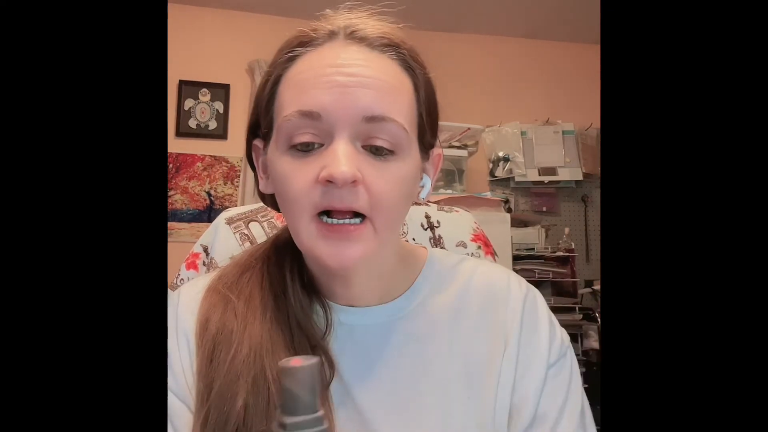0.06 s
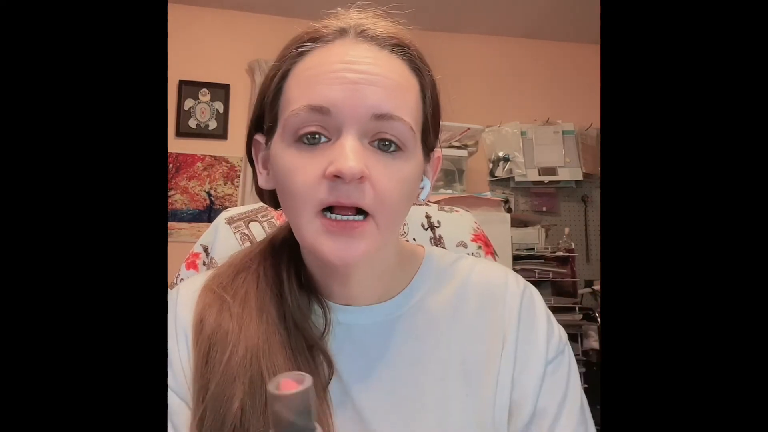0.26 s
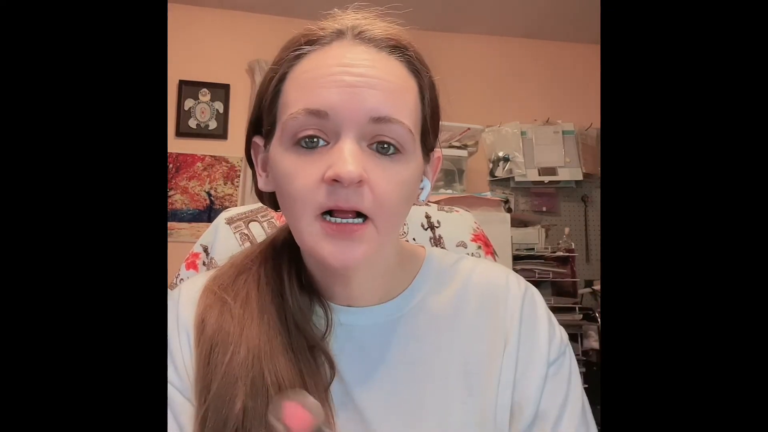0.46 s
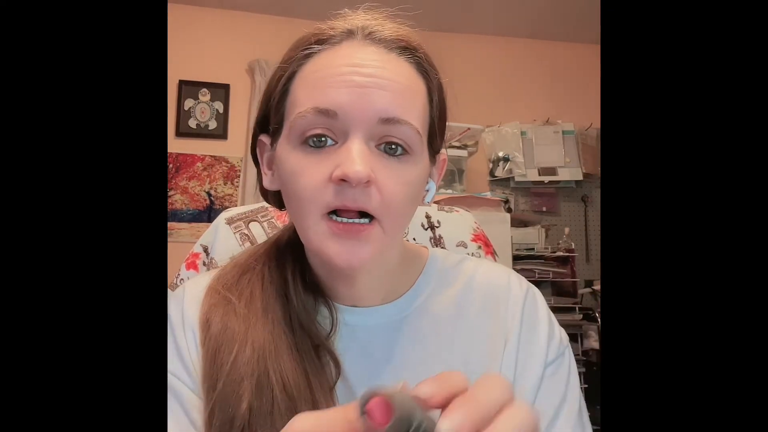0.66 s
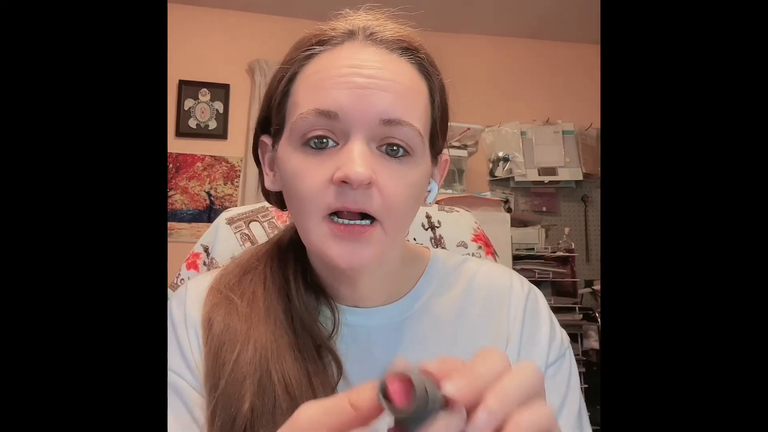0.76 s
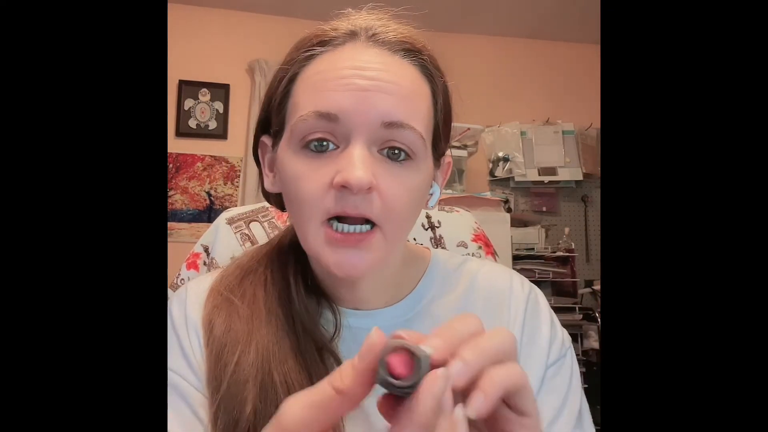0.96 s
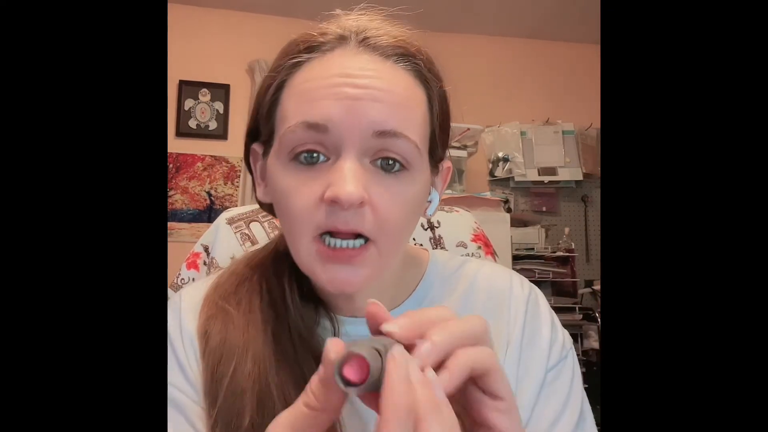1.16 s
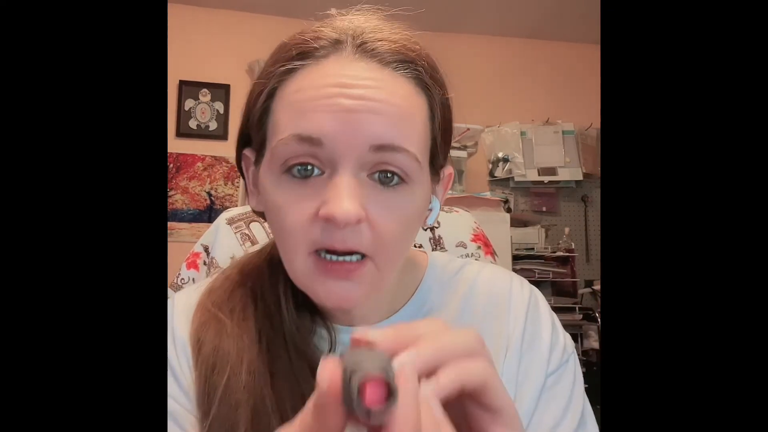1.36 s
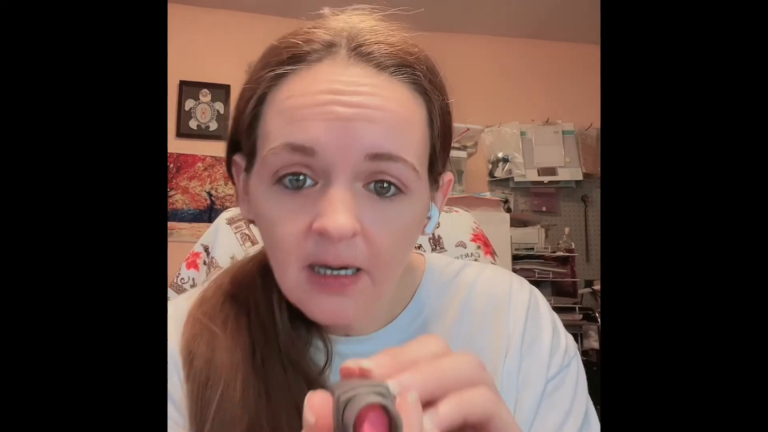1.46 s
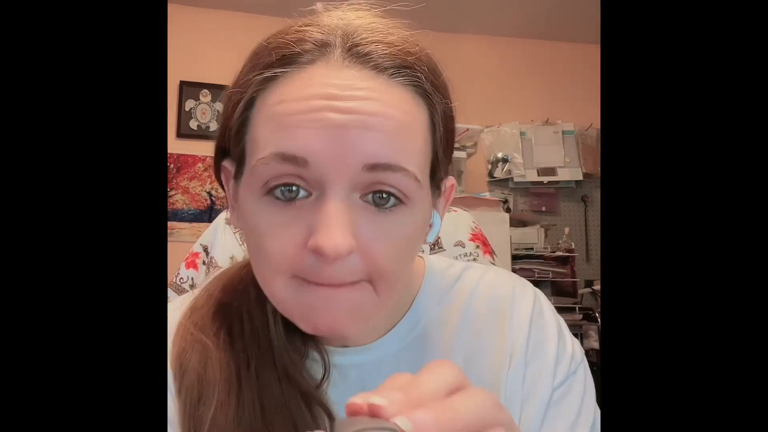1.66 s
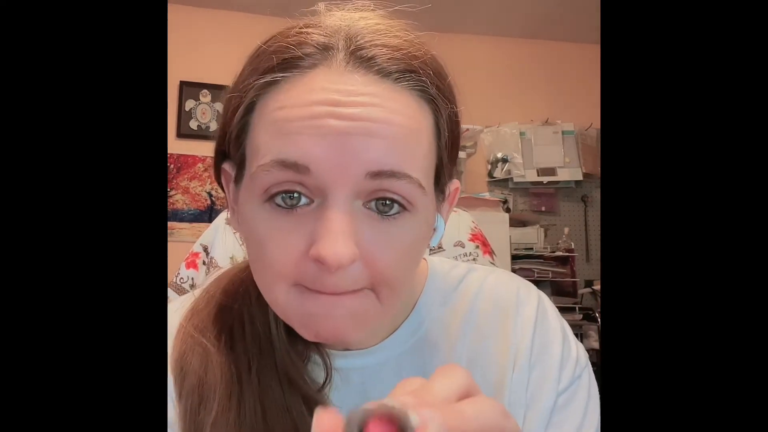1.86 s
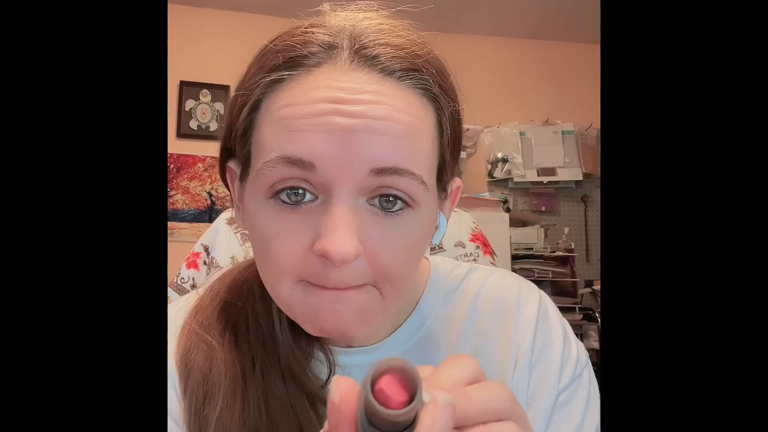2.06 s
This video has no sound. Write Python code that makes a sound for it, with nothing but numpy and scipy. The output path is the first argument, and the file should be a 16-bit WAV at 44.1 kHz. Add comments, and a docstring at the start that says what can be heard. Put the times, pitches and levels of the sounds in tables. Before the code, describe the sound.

A plastic cap pops off a lipstick tube with a lighter knock right after. Fingers slide faintly over the case, which then clicks, scrapes and creaks as it turns, close to the microphone in a small, quiet room.

```python
"""Lipstick cap, close up

Close to the microphone, at a desk in a small furnished room, a plastic cap is pulled off a lipstick
tube: the rim snaps free and the hollow cap pops, then a lighter knock follows. Fingers slide over
the case, which ticks, scrapes and creaks as it is turned. Desk and room echo it over a low mains hum."""
import sys
import numpy as np
from scipy import signal
from scipy.fft import rfft, irfft
from scipy.io import wavfile
from scipy.ndimage import uniform_filter1d

SR = 44100
rng = np.random.default_rng(int(sys.argv[2]) if len(sys.argv) > 2 else 0)


def int16_out(signal):
    """Quantize to a 16-bit WAV file."""
    q = np.round(np.clip(np.atleast_2d(signal).T, -1, 1) * 32767)
    wavfile.write(sys.argv[1], SR, q.astype(np.int16))


N = 92610


def undb(db):
    """Decibels to gain."""
    return 10 ** (np.asarray(db) / 20)


def clock():
    """Time of every sample in seconds."""
    return np.arange(N) / SR


def unit(x):
    """Scale to rms 1."""
    return x / np.sqrt(np.mean(x ** 2))


def coloured(x, spectrum):
    """Causal filter shaped by rows of freq_hz, relative_db, with a mean power gain of 1."""
    hz, db = np.array(spectrum, float).T
    freqs = np.maximum(np.fft.rfftfreq(N, 1 / SR), 1)
    gain = unit(undb(np.interp(np.log(freqs), np.log(hz), db)))
    causal_cepstrum = irfft(np.log(gain), N) * (1 + np.sign(np.fft.fftfreq(N)))
    return irfft(rfft(x) * np.exp(rfft(causal_cepstrum)), N)


def noise(spectrum):
    """Steady coloured noise with an rms near 1."""
    return coloured(rng.standard_normal(N), spectrum)


def wander(rate_hz):
    """Random drift with a spread near 1."""
    return np.interp(clock() * rate_hz, np.arange(N), rng.standard_normal(N))


def fade(start_s, t60_s):
    """Instant attack and exponential decay."""
    age = np.arange(int(2 * t60_s * SR)) / SR
    return np.pad(np.exp(-np.log(1000) * age / t60_s), (int(start_s * SR), N))[:N]


def ring(start_s, hz, t60_s):
    """One struck mode."""
    return fade(start_s, t60_s) * np.sin(2 * np.pi * hz * (clock() - start_s))


def burst(start_s, t60_s, attack_s=1 / SR, smooth_hz=90):
    """A dying burst of white noise, the chance peaks of its spectrum flattened."""
    envelope = fade(start_s, t60_s) * np.clip((clock() - start_s) / attack_s, 0, 1)
    spectrum = rfft(rng.standard_normal(N) * envelope)
    power = uniform_filter1d(np.abs(spectrum) ** 2, int(smooth_hz * N / SR))
    return irfft(spectrum * np.sqrt(power.mean() / power), N) * (envelope > 0)


def room_tone():
    """Mains hum, its higher lines wavering more, and faint room air."""
    # lines of the hum: pitch_hz, rms_db
    hum_lines = [(59.5, -47), (118.6, -71.5), (160, -72.5), (237, -76), (296, -76)]
    # spectrum of the air: freq_hz, relative_db
    air_spectrum = [(20, -29.5), (45, -22.5), (72, -7.5), (95, -17.5), (150, -14.5), (300, -23),
                    (550, -25.5), (780, -25), (1430, -32), (4780, -38.5), (7700, -39), (9700, -48.5),
                    (15600, -44), (16300, -65.5)]
    hum = 0
    for k, (hz, db) in enumerate(hum_lines, 1):
        waver = .0098 * k * k * wander(rate_hz=6.8)
        hum += undb(db) * np.sqrt(2) * np.sin(2 * np.pi * hz * clock() + waver)
    return hum + undb(-63) * noise(air_spectrum)


def room(x):
    """The microphone hears the direct sound, a few near reflections and a short diffuse tail."""
    # reflections off the desk and its surroundings: delay_s, level_db
    echoes = [(.0027, -10), (.0061, -13.5), (.0099, -22)]
    # reverberation of the room: centre_hz, level_db, t60_s
    tail_bands = [(100.2, -14, 0.48), (400, -12, 0.21), (900, -15, 0.23), (2465, -13, 0.21),
                  (5006, -9, 0.19), (8700, -10.5, .24), (16000, -11, 0.46)]
    freqs = np.maximum(np.fft.rfftfreq(N, 1 / SR), 1)
    log_centres = np.log([hz for hz, _, _ in tail_bands])
    tail = 0
    for selector, (_, db, t60) in zip(np.eye(len(tail_bands)), tail_bands):
        band = np.sqrt(np.interp(np.log(freqs), log_centres, selector))
        decay = burst(0, t60, attack_s=.014)
        tail += undb(db) * band * rfft(decay) / np.sqrt(np.sum(decay ** 2))
    near = 1 + sum(undb(db) * np.exp(-2j * np.pi * freqs * delay) for delay, db in echoes)
    return irfft(rfft(x) * near, N) + signal.fftconvolve(x, irfft(tail, N)[:N // 2])[:N]


def friction(strokes, spectrum, grain_db, attack_s=.0058, release_share=.51):
    """Grainy rubbing noise: every stroke starts quickly, holds and dies away."""
    t = clock()
    force = 0
    for start, length, db in strokes:
        rise = np.clip((t - start) / attack_s, 0, 1)
        fall = np.clip((start + length - t) / (length * release_share) + .5, 0, 1)
        force += undb(db) * rise * fall
    hiss = noise(spectrum)
    grain = undb(grain_db * wander(rate_hz=700) + .81 * wander(rate_hz=46))
    return force * unit(hiss * grain)


def finger_slides():
    """Skin slides over the case with a faint, high hiss."""
    # finger strokes: start_s, length_s, level_db
    strokes = [(.153, .033, -53), (.527, 0.032, -61.5), (.66, 0.21, -64.5), (.738, 0.052, -58.5),
               (.8, .075, -63), (.93, 0.4, -75), (1.26, 0.072, -64.5)]
    # spectrum of skin on plastic: freq_hz, relative_db
    spectrum = [(1000, -20.5), (4500, -12), (5500, -7), (6000, 2), (6700, -4.5), (7400, -2), (8100, 2.5),
                (9300, -6), (12500, -5.5), (15600, -1), (16300, -25)]
    return friction(strokes, spectrum, grain_db=4)


def scrapes():
    """Plastic scrapes on plastic as the case is turned."""
    # scraping strokes: start_s, length_s, level_db
    strokes = [(.475, 0.025, -69), (.692, 0.036, -64), (1.26, 0.19, -65), (1.472, 0.048, -51),
               (1.54, 0.059, -51.5), (1.59, 0.0417, -42.5), (1.635, 0.087, -53), (1.785, 0.055, -59)]
    # spectrum of plastic on plastic: freq_hz, relative_db
    spectrum = [(200, 0), (600, -8.5), (1400, -5.5), (2500, 2), (4000, -1.5), (6500, 2.5), (8000, -1.5),
                (9500, -15), (15500, -14.5)]
    return friction(strokes, spectrum, grain_db=4.5)


def creak():
    """The barrel sticks and slips in small uneven steps, each ringing it briefly."""
    # slips of the barrel: start_s, level_db
    slips = [(1.813, -55), (1.833, -53.5), (1.856, -49), (1.864, -62), (1.867, -52), (1.8792, -47),
             (1.8863, -61), (1.898, -48), (1.906, -53), (1.9191, -47), (1.937, -53.5)]
    # resonance of the barrel: freq_hz, relative_db
    barrel_spectrum = [(500, -19.5), (1300, -3), (1800, 0.5), (2650, -2), (3600, 2), (7000, -8),
                       (9000, -20.5), (16000, -16)]
    envelope = sum(undb(db) * fade(start, t60_s=.0055) for start, db in slips)
    rasp = coloured(rng.standard_normal(N) * envelope, barrel_spectrum)
    return rasp + sum(undb(db - 1) * ring(start, hz=1756, t60_s=.0088) for start, db in slips)


def ticks(spacing_octaves=.22):
    """Each sharp plastic tick is a broad crack and a cluster of finger-damped modes."""
    # sharp contacts: start_s, level_db, pitch_hz, crack_relative_db
    contacts = [(0.048, -49, 3440, -4.5), (0.2435, -26, 6290, -12), (0.3457, -49, 6960, -9.5),
                (0.36, -43, 6800, 2), (1.010, -59, 3070, -2), (1.033, -61, 13000, -0.5),
                (1.462, -40, 4330, 7.5), (1.5332, -44.5, 3620, 9.5), (1.5449, -38.5, 3430, -22),
                (1.5777, -22.5, 2560, -10), (1.5936, -27, 3030, -14), (1.6075, -26.5, 3530, -14),
                (1.6422, -34.5, 3700, 0.5), (1.6632, -28, 6250, -2), (1.673, -45, 6200, -7),
                (1.683, -46.5, 2640, 8), (1.6908, -32, 4030, 0.5), (1.7814, -43, 3500, 6.5),
                (2.0133, -53, 3970, -14)]
    # modes around a tick's pitch: offset_spacings, relative_db
    modes = [(-2.5, -9.5), (-1, -7.5), (0, -0.5), (1.5, -9)]
    # spectrum of the crack: freq_hz, relative_db
    crack_spectrum = [(300, -22), (1400, -14), (2100, 1), (4000, 3), (7000, 1), (9300, -14), (12000, -15),
                      (15400, -11), (16300, -22)]
    ringing = crack_envelope = 0
    for start, db, hz, crack_db in contacts:
        for offset, mode_db in modes:
            ringing += undb(db + mode_db) * ring(start, hz * 2 ** (offset * spacing_octaves), t60_s=.016)
        crack_envelope += undb(db + crack_db) * fade(start, t60_s=.014)
    return ringing + coloured(crack_envelope * rng.standard_normal(N), crack_spectrum)


def knocks(upper_ratio=1.6, upper_db=-4):
    """Duller contacts ring two short modes of the case; the hands add low thumps."""
    # hollow knocks of the case: start_s, level_db, pitch_hz, t60_s
    contacts = [(0.2567, -18, 1115, 0.021), (.347, -47, 520, 0.054), (0.36, -45.5, 1160, 0.035),
                (.368, -43.5, 548, 0.066), (0.371, -46, 364, 0.048), (1.563, -40, 1360, 0.019),
                (1.577, -51.5, 510, 0.037), (1.600, -44, 898, .04), (1.604, -54, 363, .05)]
    # soft thumps of the hands: start_s, level_db
    thumps = [(0.224, -48), (1.597, -40)]
    case = 0
    for start, db, hz, t60 in contacts:
        case += undb(db) * (ring(start, hz, t60) + undb(upper_db) * ring(start, hz * upper_ratio, t60))
    return case + sum(undb(db) * ring(start, hz=135, t60_s=.16) for start, db in thumps)


def cap_pop(start_s=.2231):
    """The rim snaps free and the hollow cap rings; neighbouring modes swing against each other."""
    # modes of the cap and the air in it: pitch_hz, relative_db, t60_s
    modes = [(362, -22.5, 0.062), (554.4, -15.5, 0.076), (605.5, -14, .04), (729, -22.5, 0.05),
             (1256, -10.5, 0.055), (1430, -18.5, 0.031), (1621, -11, 0.062), (1824, -2.5, 0.027),
             (1958, -7.5, .04), (2671, -13.5, .035), (3076, -14, 0.033), (3405, -16, 0.027),
             (3565, -13, .035), (4224, -23, 0.05), (6294, -15.5, 0.025), (8720, -32.5, 0.034),
             (13600, -34.5, .035), (15100, -34, .03)]
    # crack of the rim slipping free: freq_hz, relative_db
    crack_spectrum = [(120, -14.5), (400, -6), (1200, 7), (3300, -0.5), (5000, -2.5), (7000, -5),
                      (7700, -17.5), (11000, -19), (16000, -21.5)]
    # first instant of the snap: freq_hz, relative_db
    snap_spectrum = [(500, -9), (3000, 0), (7000, -1), (9000, -3), (13000, -2), (16000, -5.5)]
    body = sum((-1) ** k * undb(db) * ring(start_s, hz, t60) for k, (hz, db, t60) in enumerate(modes))
    crack = coloured(burst(start_s, t60_s=.03, attack_s=.0005), crack_spectrum)
    snap = coloured(burst(start_s, t60_s=.005), snap_spectrum)
    return undb(-2.5) * body + undb(-10.5) * crack + undb(-20.5) * snap


def scene():
    """The lipstick handled close to one microphone, over the room tone."""
    handling = cap_pop() + knocks() + ticks() + creak() + scrapes() + finger_slides()
    return (room(handling) + room_tone())[None]


def record(dry):
    """The recorder rounds the highest peaks and cuts the top of the treble."""
    cutoff_hz = 16200
    lowpass = signal.ellip(8, .2, 70, cutoff_hz, fs=SR, output="sos")
    return signal.sosfilt(lowpass, np.tanh(dry))


dry = scene()
out = record(dry)
int16_out(out)
```